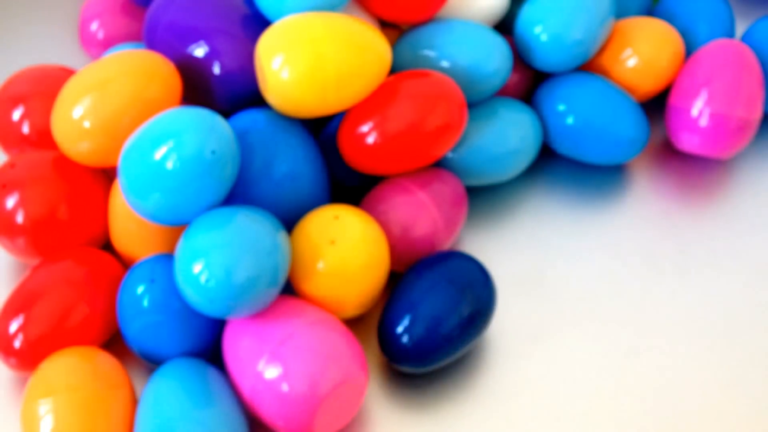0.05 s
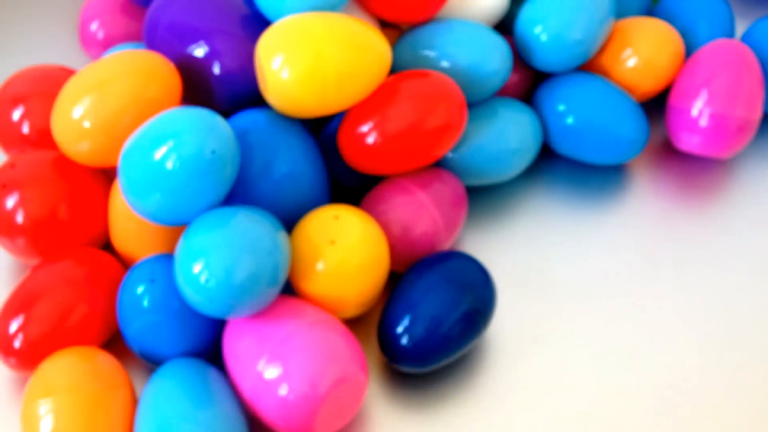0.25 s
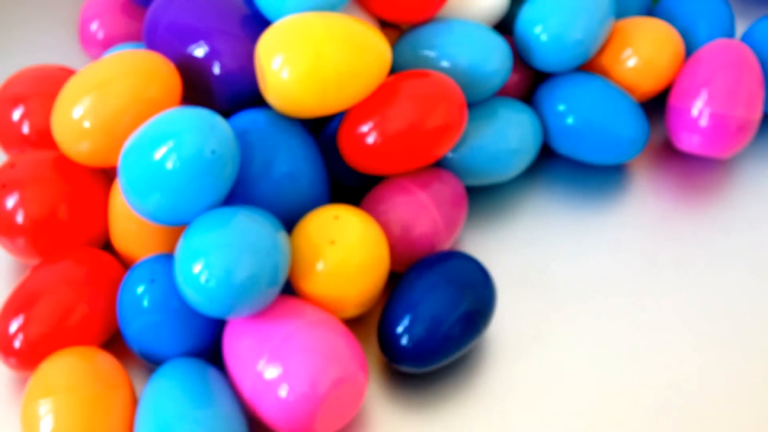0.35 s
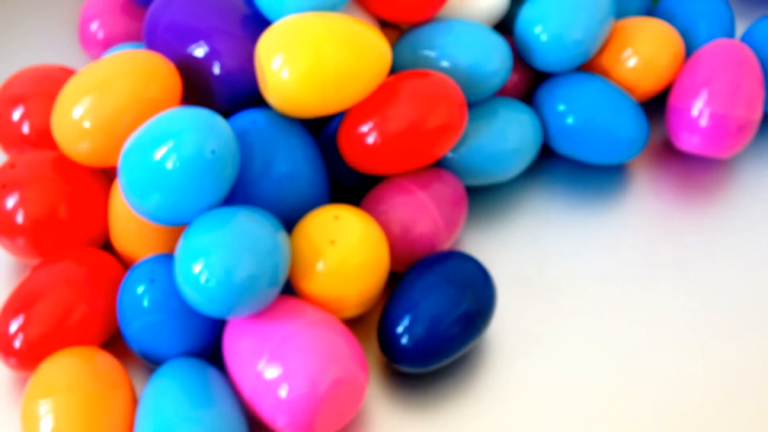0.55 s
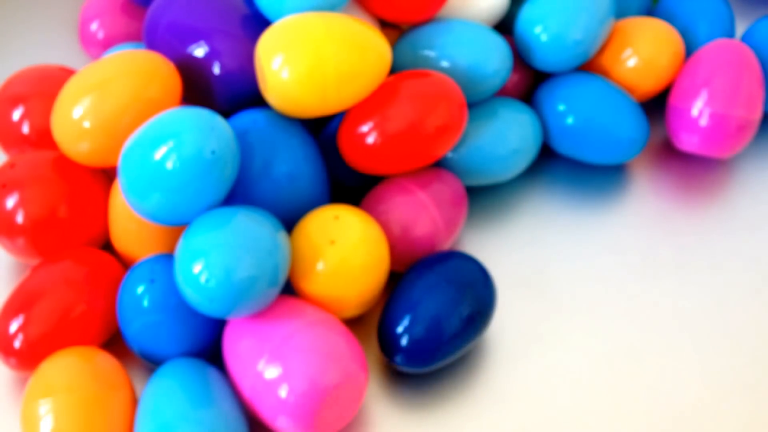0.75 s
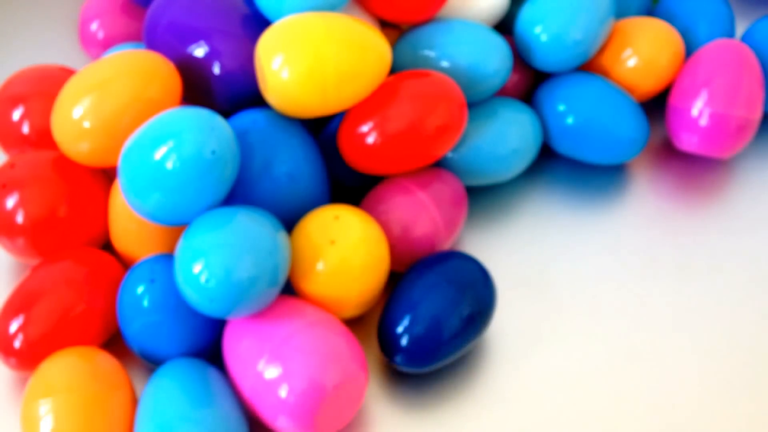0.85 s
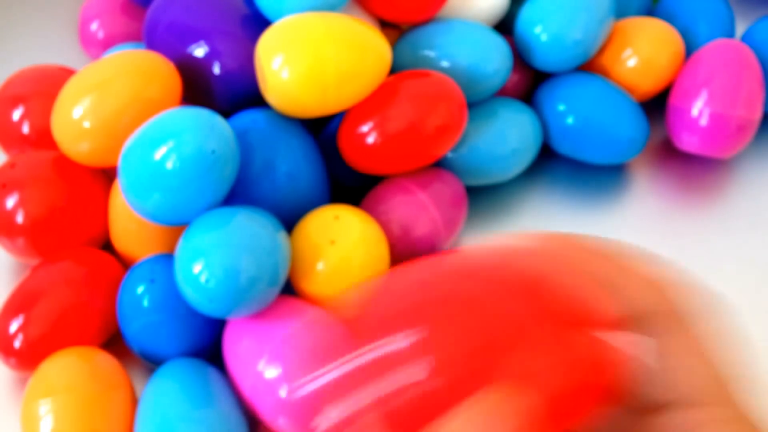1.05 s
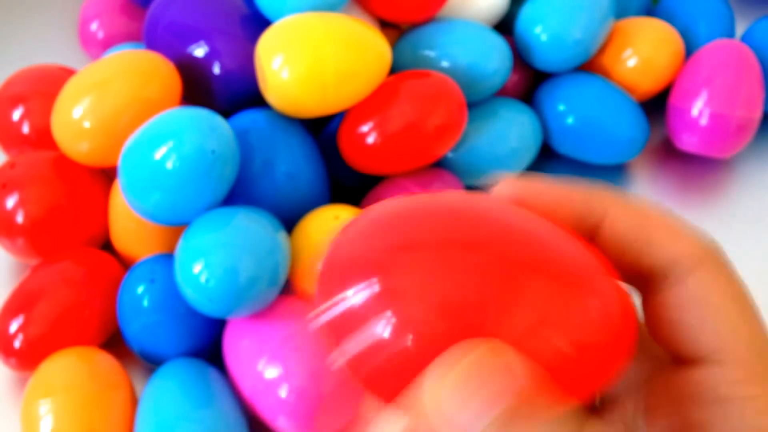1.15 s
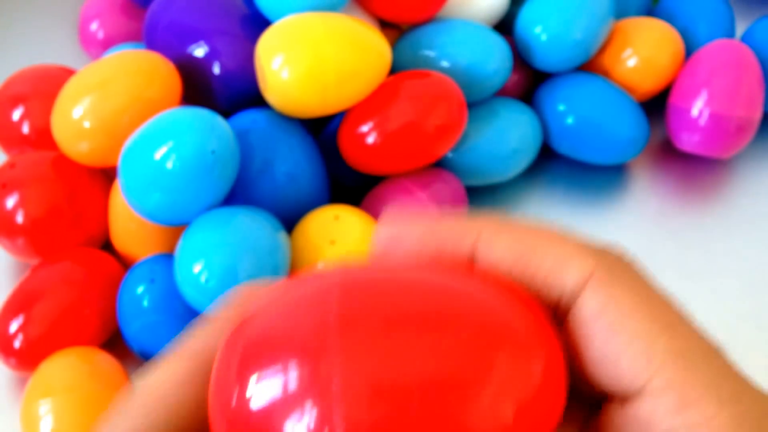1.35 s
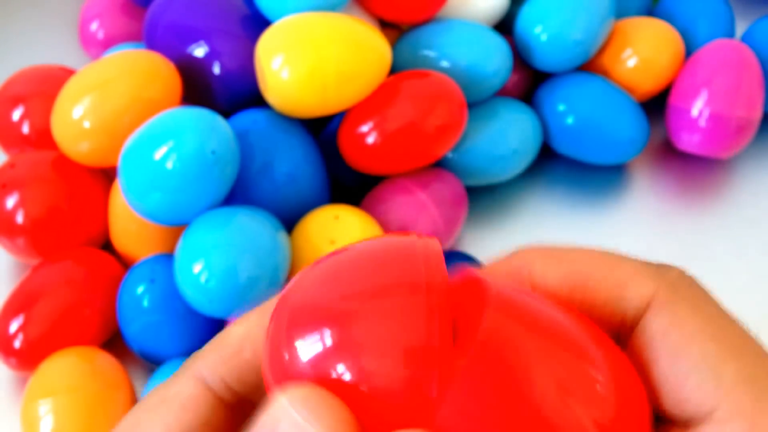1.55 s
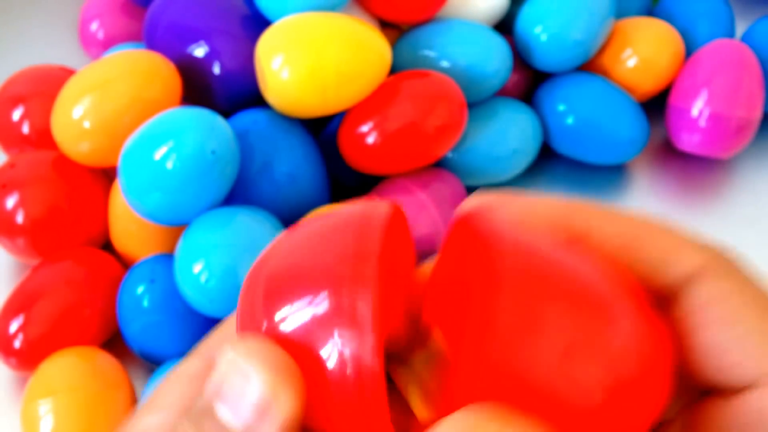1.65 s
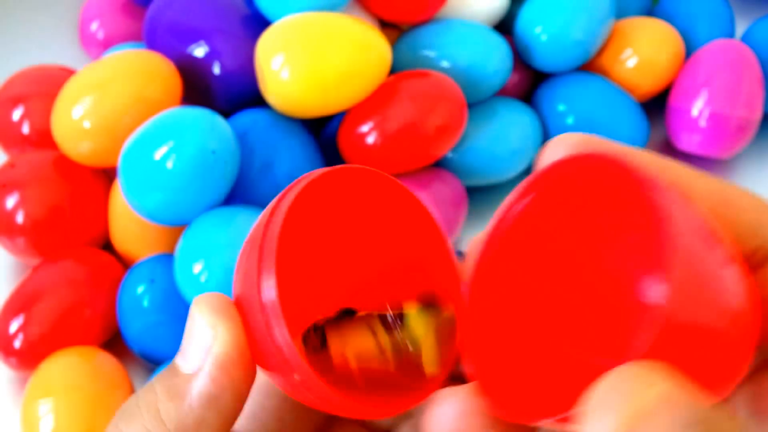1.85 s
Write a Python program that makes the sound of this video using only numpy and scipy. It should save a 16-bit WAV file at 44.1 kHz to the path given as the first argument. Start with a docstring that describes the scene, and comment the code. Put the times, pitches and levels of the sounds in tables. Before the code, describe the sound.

A hollow plastic toy egg knocks, creaks under fingers, then snaps open with sharp clicks

```python
"""Over a faint hiss a heap of hollow plastic eggs knocks and rattles and the table thuds; fingers then rub
one egg, its seam snaps in a dense burst with small puffs of air, and the parted halves hum higher.
Snaps are noise bursts plus decaying tones; rattles and rub are dense ticks through short resonances;
thuds and rumble are low table modes. A diffuse tail follows the egg sounds; the hiss is shaped noise."""
import sys
import numpy as np
from scipy import signal
from scipy.fft import rfft, irfft
from scipy.io import wavfile

SR = 44100
rng = np.random.default_rng(int(sys.argv[2]) if len(sys.argv) > 2 else 0)


def digitize_waveform(pressure):
    """Quantize a signal to 16-bit integers and store it at the path in sys.argv[1].

    Rows of a 2-D input are taken as channels; values are limited to [-1, 1].
    """
    field = np.atleast_2d(pressure).T
    bounded = np.clip(field, -1, 1)
    quanta = np.round(bounded * 32767).astype(np.int16)
    wavfile.write(sys.argv[1], SR, quanta)


N = 83790

# Table modes. Each row: frequency in Hz, level in dB, share of a thud's t60 (ratio).
TABLE_MODES = [(70, -17, 0.69), (98, -17, 0.51), (152, 1, 0.71), (125.2, 0.5, 1.15), (188.7, -4.5, 1.04),
               (280, -6, 0.66), (318.6, -4, 0.63), (488, -6, 0.18)]


def amp(db):
    """Decibels to amplitude ratio."""
    return 10 ** (np.asarray(db) / 20)


def rms_one(x):
    """Scale to rms 1."""
    return x / np.sqrt(np.mean(x ** 2) + 1e-20)


def band(x, low_hz, high_hz, order=2):
    """Butterworth bandpass."""
    return signal.sosfilt(signal.butter(order, [low_hz, high_hz], "band", fs=SR, output="sos"), x)


def at_hz(points, hz):
    """Read a (Hz, dB) curve, linear in dB over log frequency."""
    curve_hz, curve_db = np.transpose(points)
    return np.interp(np.log(hz), np.log(curve_hz), curve_db)


def add(out, start_s, x):
    """Mix x in from start_s."""
    i = int(start_s * SR)
    out[i:i + len(x)] += x[:N - i]


def ring(x, hz, t60_s):
    """Two-pole resonance: x excites a sine that decays 60 dB in t60_s."""
    radius, turn = amp(-60 / (t60_s * SR)), 2 * np.pi * hz / SR
    return signal.lfilter([0, np.sin(turn)], [1, -2 * radius * np.cos(turn), radius * radius], x + 1e-18)


def moving_ring(x, hz, t60_s):
    """A resonance whose pitch follows the curve hz; rms 1."""
    turn = np.exp(2j * np.pi * np.cumsum(hz) / SR)
    # shift the pitch to 0 Hz, smooth there, shift back
    smoothed = signal.lfilter([1], [1, -amp(-60 / (t60_s * SR))], x / turn)
    return rms_one(np.real(turn * smoothed))


def fall(t, t60_s):
    """Exponential decay, 60 dB in t60_s."""
    return amp(-60 * t / t60_s)


def ticks(colour, count=32):
    """Dense uneven little contacts dealt to short resonances across a colour; rms 1."""
    ticks_per_s, spread_db, t60_cycles = 8000, 3.5, 14.0
    sizes = amp(spread_db * np.minimum(rng.exponential(1, N), 4)) * rng.choice([-1, 1], N)
    sizes = sizes * (rng.random(N) < ticks_per_s / SR)
    dealt = rng.integers(0, count, N)
    out = np.zeros(N)
    for k, hz in enumerate(np.geomspace(colour[1][0], colour[-2][0], count)):
        t60_s = t60_cycles / hz
        rung = ring(ring(sizes * (dealt == k), hz, t60_s), hz, t60_s)
        out += amp(at_hz(colour, hz)) * hz * hz * rung  # hz squared offsets the longer rings of low pitches
    return rms_one(out)


def hiss():
    """Quiet room and microphone hiss: steady noise shaped by a spectral curve."""
    # Each row: frequency in Hz, level in dB.
    hiss_colour = [(40, 10), (230, 0), (500, -7), (1000, -9), (2700, -12.5), (5100, -11), (7400, -13),
                   (14700, -14.5)]
    level_db = -65
    hz = np.maximum(np.arange(N // 2 + 1) * SR / N, 1)
    spectrum = rfft(rng.standard_normal(N)) * amp(at_hz(hiss_colour, hz))
    return amp(level_db) * rms_one(irfft(spectrum, N))


def rumble():
    """Handling rumble: noise through the table modes under a slow level curve."""
    # Each row: time in seconds, level in dB.
    rumble_levels = [(0.0, -67), (0.254, -94), (0.448, -61), (0.502, -68), (0.65, -72), (0.808, -67),
                     (0.952, -58.5), (1.074, -64), (1.38, -65), (1.502, -58), (1.634, -66), (1.766, -74.5),
                     (1.9, -67)]
    mode_t60_s = 0.089
    s, db = np.transpose(rumble_levels)
    white = rng.standard_normal(N)
    modes = sum(amp(mode_db) * ring(white, hz, mode_t60_s) for hz, mode_db, share in TABLE_MODES)
    return amp(np.interp(np.arange(N) / SR, s, db)) * rms_one(modes)


def thuds():
    """Each thud strikes the table's low modes with slightly different strengths; they ring down."""
    # Each row: start in seconds, peak in dB, t60 in seconds.
    thud_rows = [(0.242, -22, 0.17), (0.257, -27, 0.05), (0.29, -23.5, 0.1), (0.327, -29.5, 0.11),
                 (0.417, -37.5, 0.19), (0.438, -41, 0.14), (0.578, -38, 0.11), (0.679, -28.5, 0.093),
                 (0.708, -36, 0.081), (0.852, -38.5, 0.059), (0.939, -51, 0.11), (0.995, -43.5, 0.039),
                 (1.049, -47, 0.09), (1.098, -39.5, 0.035), (1.158, -45, 0.19), (1.197, -53, 0.049),
                 (1.264, -37, 0.11), (1.311, -41.5, 0.071), (1.4, -41, 0.13), (1.423, -47, 0.083),
                 (1.641, -55, 0.089)]
    spread_db, rise_s = 1.2, 0.0039
    out, t = np.zeros(N), np.arange(SR // 2) / SR
    chance = rng.standard_normal((len(thud_rows), len(TABLE_MODES)))
    for (s, db, t60_s), own in zip(thud_rows, chance):
        thud = np.zeros(len(t))
        for (hz, mode_db, share), c in zip(TABLE_MODES, own):
            thud += amp(mode_db + spread_db * c) * np.sin(2 * np.pi * hz * t) * fall(t, t60_s * share)
        thud = thud * (1 - np.exp(-t / rise_s))
        add(out, s, amp(db) * thud / abs(thud).max())
    return out


def room(x):
    """Diffuse reflections: x convolved with decaying lowpassed noise."""
    level_db, t60_s, rise_s = -22, 0.26, 0.0062
    t = np.arange(SR // 2) / SR
    dull = signal.lfilter([.5], [1, -.5], rng.standard_normal(len(t)))
    tail = dull * fall(t, t60_s) * np.clip(t / rise_s, 0, 1)
    return amp(level_db) * signal.fftconvolve(x, tail / np.sqrt(np.sum(tail ** 2)))[:N]


def rattles(hollow, bright):
    """Eggs tumble after each knock: ticks die away, ringing on the note of the struck eggs."""
    # Each row: start in seconds, hollow level in dB, note in Hz, bright level in dB, t60 in seconds.
    rattle_rows = [(0, -93, 945, -67, 0.11), (0.02, -55.5, 980, -81, 0.06),
                   (0.209, -42.5, 1580, -38.5, 0.35), (0.2372, -20, 1526, -24, 0.2),
                   (0.262, -35, 1570, -34.5, 0.11), (0.287, -38, 950, -58.5, 0.45),
                   (0.351, -49, 1450, -53, 0.098), (0.416, -39.5, 564, -41.5, 0.19),
                   (0.492, -49.5, 600, -52, 0.15), (0.583, -55, 2050, -62, 0.36),
                   (0.643, -52, 600, -63.5, 0.32), (0.675, -35, 1200, -38, 0.17), (0.74, -61, 1140, -70, 1),
                   (0.847, -43, 1930, -46.5, 0.12), (0.89, -45.5, 1720, -57, 0.066)]
    rise_s, note_db, note_t60_cycles = 0.0013, -5, 28.0
    out, t = np.zeros(N), np.arange(SR // 2) / SR
    for s, hollow_db, note_hz, bright_db, t60_s in rattle_rows:
        part = slice(int(s * SR), int(s * SR) + len(t))
        note = amp(note_db) * rms_one(ring(hollow[part], note_hz, note_t60_cycles / note_hz))
        envelope = (1 - np.exp(-t / rise_s)) * fall(t, t60_s)
        out[part] += envelope * (amp(hollow_db) * (hollow[part] + note) + amp(bright_db) * bright[part])
    return out


def puffs():
    """Air moves as the seam gives way: one sine cycle of pressure, a push and a pull."""
    # Each row: start in seconds, peak in dB, length in seconds.
    puff_rows = [(1.486, -28.5, 0.0056), (1.4946, -20, 0.0039), (1.521, -32, 0.0052)]
    out = np.zeros(N)
    for s, db, length_s in puff_rows:
        t = np.arange(int(length_s * SR)) / SR
        add(out, s, amp(db) * np.sin(2 * np.pi * t / length_s))
    return out


def rub(hollow, bright):
    """Fingers rub with stick-slip swells: the closed wall sings, then the parted halves hum."""
    # Each row: time in seconds, hollow level in dB, bright level in dB.
    rub_levels = [(0.9, -59, -52.5), (0.94, -49, -68.5), (0.971, -52.5, -51.5), (1.0, -52, -51.5),
                  (1.049, -50.5, -60), (1.09, -46, -62.5), (1.12, -59, -69), (1.151, -61, -59),
                  (1.189, -33, -48), (1.204, -59, -66), (1.235, -51.5, -56), (1.27, -43, -49),
                  (1.312, -59, -45), (1.338, -57, -79), (1.385, -43, -46), (1.42, -43.5, -55),
                  (1.455, -52, -60.5), (1.48, -45, -55), (1.51, -40.5, -60.5), (1.548, -44, -57),
                  (1.585, -73, -66), (1.61, -49, -66), (1.655, -43.5, -55.5), (1.678, -48.5, -65),
                  (1.713, -56, -58), (1.739, -52.5, -72), (1.79, -68, -77), (1.825, -68, -96),
                  (1.844, -55, -70), (1.89, -59.5, -73)]
    # Note of the parting halves. Each row: time in seconds, frequency in Hz.
    opening_note = [(1.5, 640), (1.522, 1050), (1.54, 1420), (1.8, 1340)]
    # Singing wall. Each row: time in seconds, frequency in Hz, level in dB against the bright ticks.
    wall_song = [(0.96, 4330, 1.5), (1.0, 4160, -5), (1.05, 3730, 7), (1.1, 3720, -23), (1.5, 3800, -9)]
    start_s, fade_s = 0.875, 0.14
    open_s, hum_share, hum_t60_s, crossfade_s = 1.492, .5, .008, 0.01
    waver_hz, waver_points_per_s = 90, 20
    song_t60_s = .005
    slips_per_s, slip_db, slip_decay_s = 450, 1, .001
    t = np.arange(N) / SR

    # the note wavers as the halves shift
    steps_s = np.arange(0, N / SR + 1, 1 / waver_points_per_s)
    waver = waver_hz * np.interp(t, steps_s, rng.standard_normal(len(steps_s)))
    hum = moving_ring(hollow, np.interp(t, *np.transpose(opening_note)) + waver, hum_t60_s)

    song_s, song_hz, song_db = np.transpose(wall_song)
    song = moving_ring(bright, np.interp(t, song_s, song_hz), song_t60_s)
    bright = bright + amp(np.interp(t, song_s, song_db)) * (t < open_s) * song

    slips = rng.exponential(1, N) * (rng.random(N) < slips_per_s / SR)
    swells = signal.lfilter([1], [1, -np.exp(-1 / (slip_decay_s * SR))], slips)
    bright = bright * (1 + amp(slip_db) * np.minimum(swells, 2))

    share = hum_share * np.clip((t - open_s) / crossfade_s, 0, 1)
    hollow = (1 - share) * hollow + share * hum

    s, hollow_db, bright_db = np.transpose(rub_levels)
    mix = amp(np.interp(t, s, hollow_db)) * hollow + amp(np.interp(t, s, bright_db)) * bright
    return np.clip((t - start_s) / fade_s, 0, 1) * mix


def snaps():
    """Plastic snaps: a broad crack rings the wall and sizzles; a decaying tone rings from hollow or wall."""
    # Each row: start in seconds, crack level in dB, crack t60 in ms, wall ring in Hz, treble in dB against
    # the crack's lower band, tone peak in dB, tone in Hz, tone t60 in ms.
    snap_rows = [(0.001, -69, 26, 3000, -3, -55, 964, 51), (0.017, -55, 67, 2700, -13, -53.5, 986, 74),
                 (0.0234, -62, 43, 4270, -9, -52.5, 1030, 38),
                 (0.1354, -70, 2.0, 2700, -2, -49.5, 1150, 21), (0.2103, -33.5, 5.7, 3530, 1, -39, 1090, 8),
                 (0.219, -29, 13, 5900, -1, -50.5, 1520, 2), (0.2386, -21.5, 11, 3840, -12, -22, 1380, 3.7),
                 (0.2406, -26, 11, 4400, 11.5, -9, 1504, 21), (0.2415, -45, 3, 3000, -5, -13, 710, 5.1),
                 (0.2492, -13.5, 3.6, 6900, 8, -5.5, 1516, 26),
                 (0.2652, -23.5, 110, 4700, 3, -15.5, 1420, 11), (0.259, -41, 47, 6700, 6, -20, 2060, 30),
                 (0.2912, -31, 5.2, 7000, 4, -14.5, 600, 4.6), (0.2939, -34, 74, 4100, -1, -19, 833, 17),
                 (0.355, -40, 33, 2950, -2, -35.5, 1674, 39), (0.4147, -28, 12, 2850, -8, -45, 2220, 3.5),
                 (0.4288, -55, 4.4, 5470, -15, -24.5, 706, 10.7),
                 (0.433, -44, 23, 2890, 8.5, -31.5, 490, 71), (0.44, -53, 21, 6440, -15, -27.5, 476, 34),
                 (0.468, -40, 9.4, 4030, -23, -42.5, 2360, 13),
                 (0.4964, -39.5, 30, 4100, -15, -45.5, 515, 6.6),
                 (0.5913, -48, 25, 3840, -12, -47, 2030, 53),
                 (0.668, -55.5, 36, 2940, -19, -35.5, 1440, 5.8),
                 (0.6786, -23.5, 10, 4540, -15, -25.5, 1220, 7.2),
                 (0.683, -34.5, 21, 4220, 1, -27, 1320, 12), (0.742, -52, 8, 2480, -12, -45.5, 2400, 12),
                 (0.825, -50, 90, 2790, -8, -45, 1530, 5.6), (0.8491, -43, 6.2, 5700, 0, -36, 2160, 14),
                 (0.852, -49, 5, 2640, -10, -38, 990, 13), (0.8914, -40.5, 5.6, 3950, -2, -40, 1640, 30),
                 (0.8939, -58, 5, 2900, -5, -42.5, 940, 20), (0.914, -53, 8, 2980, -5, -47, 1600, 25),
                 (0.937, -48, 30.0, 3000, 0, -43, 623, 45), (0.9625, -42, 5, 4500, -20, -40, 4400, 10),
                 (0.967, -37, 8, 6800, -12, -41, 4400, 10), (0.9783, -31, 2, 2700, -10, -36, 1900, 3),
                 (0.981, -34, 43, 2970, -16, -36, 1350, 3.1), (0.986, -34, 1.8, 3540, -10, -34, 3580, 6.7),
                 (0.9888, -31, 13, 6500, -4, -41, 4340, 10), (0.996, -37, 8, 4200, 1, -40, 4100, 10),
                 (1.0094, -26.5, 9.2, 7750, -27, -32, 4460, 10),
                 (1.0197, -29, 8.7, 6700, -22, -34, 3940, 16), (1.0371, -26, 6, 3100, -21, -30.5, 3970, 10),
                 (1.039, -33, 10, 3300, -15, -37, 1460, 34), (1.069, -29, 17, 2600, -12, -29.5, 1750, 5.4),
                 (1.0965, -54, 27, 2980, 5, -37.5, 677, 37), (1.111, -13.5, 1.4, 2900, 8, -12, 2120, 5.7),
                 (1.1138, -5, 2.5, 3990, -42, -17, 3940, 8.9), (1.118, -36, 10.1, 2680, 1, -15, 2600, 5.5),
                 (1.1205, -38, 3, 3350, -4, -30, 2070, 1.5), (1.1284, -39, 3.3, 4270, -11, -40, 1520, 2.8),
                 (1.1628, -15.5, 4, 3950, -25, -22.5, 1130, 1.1),
                 (1.1645, -38, 3.8, 3680, -3, -24, 3540, 16), (1.171, -5.5, 3.2, 2920, -43, -15, 2200, 2.2),
                 (1.1817, -23, 5.3, 4240, -17, -27, 1470, 3.2),
                 (1.1868, -31, 6.4, 3800, 12.5, -17.5, 1850, 3.1),
                 (1.2096, -19.5, 2.9, 4630, -6, -29, 1460, 5.1),
                 (1.2202, -10, 0.7, 4330, -31, -24, 1930, 3.3), (1.223, -17, 6.6, 4300, 2, -48, 1460, 6.1),
                 (1.2277, -35, 6.5, 3600, -13, -25, 2150, 5.5),
                 (1.245, -15.5, 2.3, 5840, 3.5, -34, 2130, 6.8),
                 (1.248, -24, 5.5, 2650, -22, -24, 2300, 3.2), (1.2562, -35, 4.2, 4500, -15, -36, 2200, 4),
                 (1.2827, -15, 13.4, 4420, -10, -12, 2325, 7), (1.303, -30, 2, 3550, 11, -17, 2620, 1.6),
                 (1.3058, -24, 2.3, 3530, 4.5, -43, 1800, 1.1), (1.308, -21.5, 10, 4250, -11, -38, 1160, 4),
                 (1.3119, -18, 2.1, 2790, 5.5, -48, 2100, 3.2),
                 (1.3327, -26.5, 4.0, 8800, -7, -38, 1720, 7.1),
                 (1.3513, -20.5, 2.6, 6550, 3.5, -24, 2190, 16.5),
                 (1.3724, -26.5, 6.5, 3760, -2, -38, 2420, 5.8), (1.38, -32, 4, 1300, -5, -36, 3800, 6.2),
                 (1.3958, -23.5, 2.7, 3600, -20, -31, 1670, 11), (1.4, -35, 6.3, 2700, -2, -31, 2270, 3.9),
                 (1.4034, -38, 40, 4130, 0, -39, 990, 9.7), (1.4156, -32, 15, 4260, -16, -35, 1550, 6.8),
                 (1.419, -30.5, 6.6, 2670, -13, -32, 1220, 7.7),
                 (1.468, -26, 5.2, 2700, -18, -32, 2180, 1.5), (1.4883, -24.5, 45, 3870, 6, -30, 795, 15),
                 (1.4905, -9, 7.4, 2000, -10, -17.5, 780, 4.1),
                 (1.4965, -15.5, 1.7, 4200, -27, -14.5, 660, 14.5),
                 (1.52, -22.5, 36, 2780, -19, -32, 1040, 22), (1.5239, -21, 10, 4870, 5.5, -9.5, 1070, 5.3),
                 (1.5278, -23, 110, 5260, -3, -22.5, 1210, 39),
                 (1.538, -12, 16.4, 3230, -7, -10.5, 1490, 12),
                 (1.5422, -33, 8.9, 4060, -14, -28, 1310, 27), (1.5632, -26, 1.8, 1700, -8, -42, 1200, 3.7),
                 (1.573, -38, 20, 2500, -8, -30, 2110, 27), (1.57, -22, 3.6, 9600, 7.5, -29, 1350, 18),
                 (1.578, -29, 59, 2500, -13, -24.5, 1470, 17), (1.6, -47, 27, 3070, -10, -30.5, 1300, 9.3),
                 (1.615, -60, 24.4, 3000, -3, -35, 1330, 18), (1.6244, -48, 45, 2700, 2, -27, 1475, 16),
                 (1.6422, -16.5, 3.9, 4900, 1.5, -20.5, 1495, 13),
                 (1.6453, -23.5, 25, 2620, -37, -46, 1260, 7), (1.6513, -46, 5.4, 4680, -8, -32, 1297, 12),
                 (1.6901, -30, 12, 5430, 2, -32.5, 1308, 46), (1.7013, -66, 2.1, 2790, -8, -18.5, 1410, 12),
                 (1.7099, -27, 31, 2700, -3, -23, 2060, 5), (1.718, -49, 14.3, 4300, -5, -33, 1460, 16),
                 (1.8305, -23, 6.4, 6600, -4.5, -27.5, 1470, 8.1),
                 (1.8333, -34.5, 10, 2300, -18, -42, 2360, 8)]
    low_hz, mid_hz, high_hz = 600, 6100, 9900
    spike_db = 12.5  # added to the first noise sample
    broad_db, sizzle_db, sizzle_t60_s = -5, -15, 0.057
    wall_db, wall_t60_s = -4, .0022
    tone_rise_cycles = 0.92
    out, t = np.zeros(N), np.arange(4000) / SR
    white = rng.standard_normal((len(snap_rows), len(t)))
    white[:, 0] += amp(spike_db)
    lows, tops = band(white, low_hz, mid_hz), band(white, mid_hz, high_hz, order=1)
    for row, low, top in zip(snap_rows, lows, tops):
        s, crack_db, crack_ms, wall_hz, top_db, tone_db, tone_hz, tone_ms = row
        burst = fall(t, crack_ms / 1000)
        wall = ring(burst * low, wall_hz, wall_t60_s)
        envelope = amp(broad_db) * burst + amp(sizzle_db) * fall(t, sizzle_t60_s)
        crack = envelope * (low + amp(top_db) * top) + amp(wall_db) * wall / abs(wall).max()
        swell = (1 - np.exp(-t * tone_hz / tone_rise_cycles)) * fall(t, tone_ms / 1000)
        tone = swell / swell.max() * np.sin(2 * np.pi * tone_hz * t)
        add(out, s, amp(crack_db) * crack + amp(tone_db) * tone)
    return out


def scene():
    """Egg sounds with their room tail, over puffs, table and hiss."""
    # Colours of the ticks. Each row: frequency in Hz, level in dB.
    hollow_colour = [(210, -34), (350, -9.5), (541, -3), (644, -9), (1230, -3.5), (1510, -0.5),
                     (1860, -5.5), (2120, 0), (2800, -36), (3640, -80), (6160, -120)]
    bright_colour = [(2000, -30), (2600, 0), (3000, -7.5), (4000, 1.5), (5100, -3), (7000, -1.5),
                     (9000, -15.5), (11500, -19), (14500, -23), (15500, -30)]
    hollow, bright = ticks(hollow_colour), ticks(bright_colour)
    egg = snaps() + rattles(hollow, bright) + rub(hollow, bright)
    return (egg + room(egg) + puffs() + thuds() + rumble() + hiss())[None]


def record(dry):
    """The microphone rolls off at both ends, then a steep lowpass cuts the top."""
    mic_low_hz, mic_top_hz, cutoff_hz = 60.6, 16000, 16500
    soft = signal.sosfilt(signal.butter(8, mic_top_hz, fs=SR, output="sos"), dry)
    soft = signal.sosfilt(signal.butter(2, mic_low_hz, "high", fs=SR, output="sos"), soft)
    return signal.sosfilt(signal.cheby2(12, 70, cutoff_hz, fs=SR, output="sos"), soft)


dry = scene()
out = record(dry)
digitize_waveform(out)
```